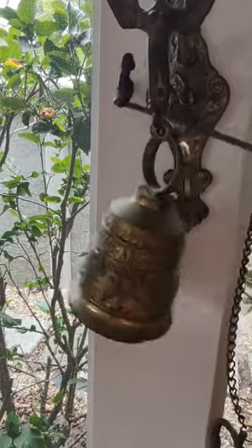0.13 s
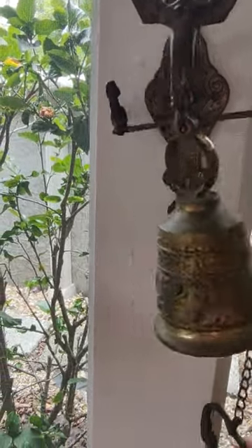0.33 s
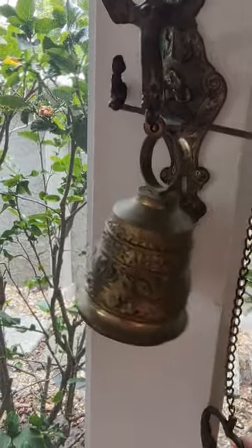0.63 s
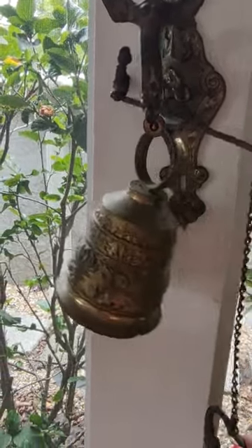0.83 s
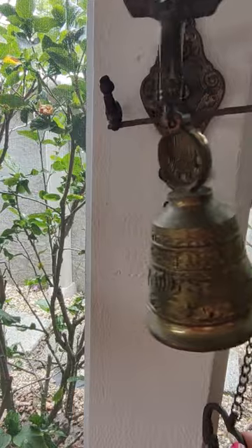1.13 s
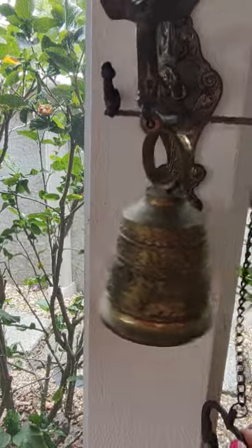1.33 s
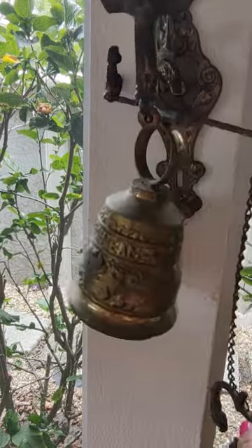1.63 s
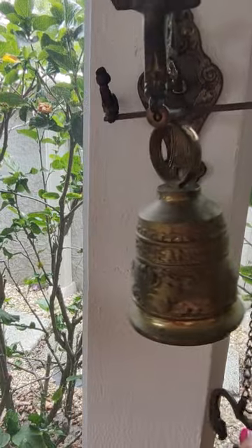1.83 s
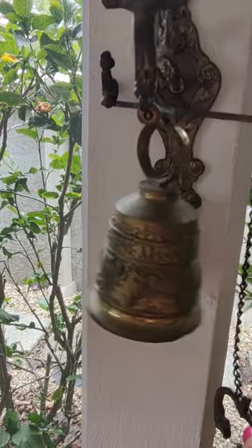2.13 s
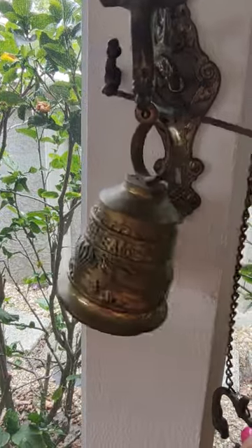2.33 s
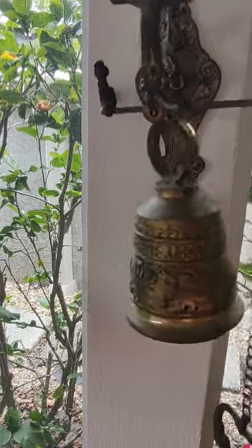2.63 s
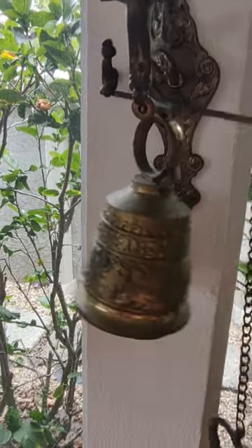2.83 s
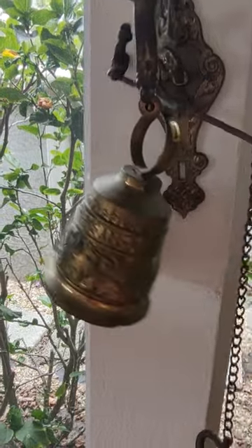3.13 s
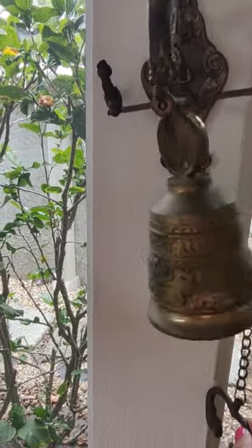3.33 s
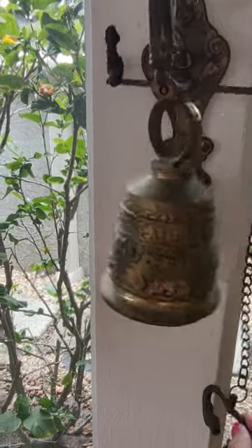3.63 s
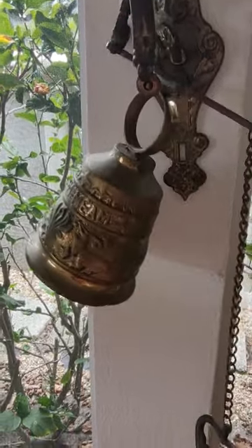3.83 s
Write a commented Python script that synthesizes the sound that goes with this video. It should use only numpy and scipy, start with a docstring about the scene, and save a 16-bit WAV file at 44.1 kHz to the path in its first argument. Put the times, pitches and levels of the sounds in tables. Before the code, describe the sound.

A small brass bell clangs several times in the first half second, then twice gently around 1.2 seconds. Its ring throbs and sways between left and right, fading over about three seconds while the pull chain clinks lightly. The handle knocks softly near 2.9 seconds, the clapper taps twice around 3.5, and the handle knocks again at 3.8. Faint street rumble and a machine's drone and hiss continue underneath.

```python
"""Outdoors, over distant street rumble, a machine's drone and hiss, a small brass bell swings on a wall.
Its clapper hits the rim several times in the first half second, then twice more gently. Two close tones
ring on and throb as the swing sweeps the sound past two microphones. While they fade, the pull chain
clinks. Near the end the handle knocks softly, the clapper taps twice, and the handle knocks again."""
import sys
import numpy as np
from scipy import signal
from scipy.fft import rfft, irfft, next_fast_len
from scipy.io import wavfile
from scipy.ndimage import uniform_filter1d, minimum_filter1d, map_coordinates

SR = 44100
rng = np.random.default_rng(int(sys.argv[2]) if len(sys.argv) > 2 else 0)


def unload_wav(signal):
    """Save mono or channel-first audio to the path in sys.argv[1] as 16-bit WAV at rate SR, clipped to [-1, 1]."""
    wavfile.write(
        sys.argv[1],
        SR,
        np.round(np.clip(np.atleast_2d(signal).T, -1, 1) * 32767).astype(np.int16),
    )


N = 176400

# The street noise's tone. Each row: frequency in Hz, relative level in dB.
STREET_TONE = [(40, -35), (75, 5), (120, -1.5), (250, -0.5), (800, -1.5), (1500, -7), (3000, -11.5),
               (4500, -19), (6000, -17), (8500, -7), (10500, -20.5), (15800, -37.5)]
# The street's loudness. Each row: time in seconds, level in dB.
STREET_LEVEL = [(0, -47), (1, -48), (2, -50), (2.5, -52.5), (2.95, -50.5), (3.3, -54), (4, -52)]
# How alike the street is on both sides. Each row: frequency in Hz, likeness from 0 to 1.
LIKENESS = [(300, .93), (700, 0.29), (3000, 0.05)]
# Where street and chain sit. Each row: frequency in Hz, lean to the left in dB.
PAN = [(100, -1), (1000, 1), (8500, -4), (13000, 7.5)]
# The machine. Each row: pitch in Hz, level in dB against the street noise.
DRONE = [(479.5, -1.5)]
# Handle knocks. Each row: start in seconds, level in dB.
KNOCKS = [(2.76, -43), (2.886, -44.5), (2.931, -39.5), (2.956, -39.5), (3.795, -42), (3.827, -34)]
# A knock's tone. Each row: frequency in Hz, relative level in dB.
KNOCK_TONE = [(70, 0), (400, 2), (1300, 6), (2800, -9), (6500, -37.5)]
# Chain clinks. Each row: start in seconds, relative level in dB, brightness in dB per octave.
CLINKS = [(0.3088, -27.5, -1.5), (0.785, -31, 7), (1.142, -43, 2.5), (1.5388, -24, -3), (1.588, -39.5, 23),
          (1.732, -39.5, 7), (1.7934, -35.5, -8), (1.8048, -26.5, -7), (1.854, -37.5, -0.5),
          (1.8658, -37, -3), (2.15, -26.5, 7), (2.2022, -37, -1), (2.2937, -35.5, 1), (2.714, -30, 2),
          (3.268, -30, -4)]
# A link's tones before sharpening. Each row: pitch in Hz, level in dB, ring time in seconds.
LINK_TONES = [(6950, -7, 0.029), (8240, 5, 0.04), (10270, -14, 0.087), (12200, -20, 0.034),
              (13270, -11, 0.03), (15400, -31, .035)]
# Clapper blows. Each row: start in seconds, then low-tone level, high-tone level and sideways lean in dB.
BLOWS = [(-0.05, -9, -14.5, 7.5), (0.0633, -6.5, -12, -11), (0.4065, -28, -5.5, 7), (0.419, -21, -20.5, 12),
         (0.459, -16, -46.5, 29), (1.1757, -37.5, -24, 7), (1.225, -52, -47, -16),
         (3.4531, -45.5, -19.05, -1), (3.5698, -49, -23.5, 4)]
# A blow's crack and the bell's faint tones. Each row: frequency in Hz, relative level in dB.
CRACK_TONE = [(500, -20.0), (2600, -2.5), (16000, -37.5)]
FAINT_TONES = [(7000, -22.5), (14500, -33)]
# The bell's upper pitches in Hz.
CLANG_HZ = [3596.5, 3699, 4641, 4676, 5110.6, 5176, 6515, 6606, 7512, 7551, 7976, 8860, 9132, 9705, 9828,
            10660, 11330]
# Those tones. Each row: level in dB, ring time in seconds, side of the rim, left gain in dB,
# angle of the left lobe in radians. A lobe is a direction in which a tone is loud.
CLANG_TONES = [(-0.5, 0.92, 0.27, -12, -0.29), (-0.5, 1.06, 0.12, -7.5, -1.06),
               (-1, 0.46, -0.71, -12, 0.01), (-18, 0.46, -1.33, -13, -1.1), (-2, 0.61, -0.18, -11, 1.3),
               (-12, 0.74, -0.31, 1, 0.0012), (-9, 0.49, -1.185, -6.5, -1.37),
               (-19.5, 0.39, 0.27, -7.5, -1.1), (-4, 0.36, -0.86, -8, 1.9), (-12, 0.21, 0.64, -11.5, 0.56),
               (-14.5, 0.4, -0.72, -6.5, -0.065), (-15, 0.34, 1.45, -3, -0.16),
               (-7.5, 0.45, -0.63, -7.03, 0.037), (-20, 0.51, 0.55, 0.9, -3),
               (-16, 0.48, -0.17, 0.5, -0.44), (-24, 0.33, 0.73, 12.5, 0.39), (-34, 0.28, 0.75, 16, 0.79)]
# How much the swing moves the right level: one share for each of six low tones, then one for the rest.
RIGHT_SWING = [0.45, -0.39, 0.53, 0.28, 0.87, -0.16, 0.59]
# The bell's two lowest pitches in Hz: its hum.
HUM_HZ = 1307.5, 1322.0
# Those tones. Each row: level in dB, steady and swinging shares on the left, the same on the right,
# right delay in radians.
HUM_TONES = [(6.5, 0.29, 0.31, 0.022, 0.55, 0.39), (6, 0.49, 0.05, 0.41, 0.033, 0.99)]
# The hum's loudness. Each row: time in seconds, relative level in dB.
HUM_LEVEL = [(0, -19), (.15, -23.5), (.38, -16.5), (.5, -18), (.85, -24.5), (1.2, -25), (1.6, -32.5),
             (2.1, -37.5), (2.45, -49.5), (2.9, -52.5), (3.2, -54.5), (4, -73.5)]

SWING_S, SWING_PEAK_S, SWAY_M = .755, .525, .015
KNOCK_RING_S, CRACK_RING_S, FAINT_RING_S = .06, .022, .27  # a ring time is the time to fade by 60 dB
RISE_S, LEFT_DELAY_S, LOW_BELOW_HZ = .0012, .000136, 5800
TIME = np.arange(N) / SR


def amp(db):
    """Turn decibels into a gain."""
    return 10 ** (np.asarray(db) / 20)


def unit(x):
    """Scale to an average power of 1."""
    return x / np.sqrt(np.mean(x ** 2) + 1e-20)


def along(points, hz):
    """Read between (Hz, value) rows on a pitch scale."""
    f, v = np.transpose(points)
    return np.interp(np.log(hz + 1), np.log(f + 1), v)


def curve(rows):
    """Join (seconds, value) rows, one value per sample."""
    return np.interp(TIME, *np.transpose(rows))


def wobble(rate):
    """A smooth curve through rate random points a second."""
    return map_coordinates(rng.standard_normal(int(N * rate / SR) + 4), [np.arange(N) * rate / SR])


def filtered(x, response):
    """Scale each frequency in x by response(Hz)."""
    m = next_fast_len(x.shape[-1] + 8192)
    return irfft(rfft(x, m) * response(np.fft.rfftfreq(m, 1 / SR)), m)[..., :x.shape[-1]]


def add(out, start, sound):
    """Mix a sound in at start seconds; skip it if that is before zero."""
    i = round(start * SR)
    if i >= 0:
        out[..., i:i + sound.shape[-1]] += sound[..., :N - i]


def street():
    """Patchy distant rumble and hiss, with a machine's slightly unsteady drone."""
    spectrum = signal.stft(rng.standard_normal((2, N)), nperseg=512)[2]
    patches = uniform_filter1d(rng.standard_normal(spectrum.shape[1:]), 6, 0)
    patches = uniform_filter1d(patches, 14, 1)
    patchy = signal.istft(spectrum * amp(2.1 * unit(patches)), nperseg=512)[1][:, :N]
    width = lambda f: np.arccos(along(LIKENESS, f)) / 2
    mid, side = filtered(patchy, lambda f: amp(along(STREET_TONE, f))
                         * [np.cos(width(f)), np.sin(width(f))])
    noise = filtered(np.array([mid + side, mid - side]), lambda f: amp(along(PAN, f) * [[.5], [-.5]]))
    drone = sum(amp(db + 2 * wobble(5.5)) * np.sin(2 * np.pi * hz * TIME + .21 * wobble(32))
                for hz, db in DRONE)
    return amp(curve(STREET_LEVEL)) * (unit(noise) + drone)


def handle():
    """The pull handle knocks: short, dull bursts of noise."""
    out, t = np.zeros((2, N)), np.arange(5000) / SR
    for start, db in KNOCKS:
        mid, side = filtered(rng.standard_normal((2, len(t))), lambda f: amp(along(KNOCK_TONE, f)))
        envelope = amp(db - 60 * t / KNOCK_RING_S) * (1 - np.exp(-t / .0012))
        add(out, start, envelope * unit(mid + side * [[.4], [-.4]]))
    return out


def chain():
    """Links tap each other, and the brief chatter makes them ring."""
    out, t = np.zeros((2, N)), np.arange(5000) / SR
    for start, db, bright_db in CLINKS:
        chatter = amp(-60 * t / .055) * (1 - np.exp(-t / .0005)) * rng.standard_normal((2, len(t)))
        scatter_db = rng.normal(0, 3.5, len(LINK_TONES))

        def resonance(f):
            total = 0
            for (hz, level, ring_s), extra_db in zip(LINK_TONES, scatter_db):
                level += extra_db + bright_db * np.log2(hz / 8200)
                pan_db = along(PAN, hz) * np.array([[1], [-1]])
                total += amp(level + pan_db) * 1j * f / (hz * hz - f * f + 5j * f / ring_s)
            return total * abs(total) ** .38  # sharpen the peaks

        ring = filtered(chatter, resonance)
        add(out, start - .001, amp(db + 5.5) * ring / abs(ring).max())
    return out


def clapper():
    """A blow makes a sharp crack and wakes 50 faint, short tones in the bell."""
    out, t = np.zeros((2, N)), np.arange(12000) / SR
    hz, life = rng.uniform(7000, 14500, (50, 1)), rng.lognormal(0, .3, (50, 1))
    rings = amp(along(FAINT_TONES, hz) - 60 * t / (FAINT_RING_S * life)) * np.exp(2j * np.pi * hz * t)
    for start, low_db, high_db, _ in BLOWS:
        shimmer = (rng.standard_normal((2, 50)) + 1j * rng.standard_normal((2, 50))) @ rings
        burst = amp(max(low_db, high_db - 9) - 60 * t / CRACK_RING_S) * rng.standard_normal((2, len(t)))
        crack = filtered(burst, lambda f: amp(along(CRACK_TONE, f)))
        add(out, start, amp(high_db) * (1 - np.exp(-t / RISE_S)) * shimmer.real + crack)
    return out


def swing():
    """The swinging bell's tilt, from -1 to 1."""
    return np.cos(2 * np.pi * (TIME - SWING_PEAK_S) / SWING_S)


def bell_clang():
    """Each blow feeds the upper tones by where and how hard it lands; the swing turns their lobes."""
    tilt, out = swing(), np.zeros((2, N))
    coarse_time = TIME[::16]
    for k, (hz, (db, ring_s, side, left_db, angle)) in enumerate(zip(CLANG_HZ, CLANG_TONES)):
        energy = 0
        for start, low_db, high_db, lean_db in BLOWS:
            age = np.maximum(coarse_time - start, 0)
            level = db + (low_db if hz < LOW_BELOW_HZ else high_db) + side * lean_db
            energy += (amp(level - 60 * age / ring_s) * (1 - np.exp(-age / RISE_S))) ** 2
        envelope = np.interp(TIME, coarse_time, np.sqrt(energy))
        phase = 2 * np.pi * (hz * TIME + rng.random())
        left = amp(left_db) * (np.cos(angle) + np.sin(angle) * tilt)
        right = 1 + RIGHT_SWING[min(k, len(RIGHT_SWING) - 1)] * tilt
        out[0] += left * envelope * np.sin(phase - 2 * np.pi * hz * LEFT_DELAY_S)
        out[1] += right * envelope * np.sin(phase)
    return out


def bell_hum():
    """Two close tones throb as they drift in and out of step; the swing sweeps their lobes around."""
    t, tilt, out = TIME - .002, swing(), np.zeros((2, N))
    for k, (db, left, left_swing, right, right_swing, delay) in enumerate(HUM_TONES):
        sway_s = k * SWAY_M * tilt / 343  # swaying nearer and farther bends the higher tone
        phase = 2 * np.pi * HUM_HZ[k] * (t + sway_s)
        out[0] += amp(db) * (left + left_swing * tilt) * np.cos(phase)
        out[1] += amp(db) * (right + right_swing * tilt) * np.cos(phase - delay)
        if k == 0:  # the lower tone bounces off the wall, a quarter cycle ahead
            out -= .31 * np.sin(phase)
    return out * amp(curve(HUM_LEVEL))


def scene():
    """Mix the bell, its pull and the street in stereo."""
    return bell_hum() + bell_clang() + clapper() + chain() + handle() + street()


def record(dry):
    """Turn loud peaks down for a moment, then cut the highest treble."""
    ceiling, hold_samples, top_hz = .95, 441, 16480
    needed_gain = ceiling / np.maximum(abs(dry).max(axis=0), ceiling)
    gain = uniform_filter1d(minimum_filter1d(needed_gain, hold_samples), hold_samples)
    return filtered(dry * gain, lambda hz: hz < top_hz)


dry = scene()
out = record(dry)
unload_wav(out)
```